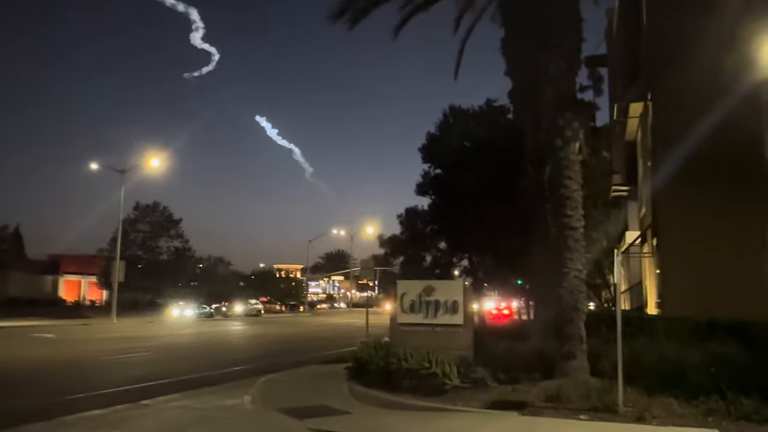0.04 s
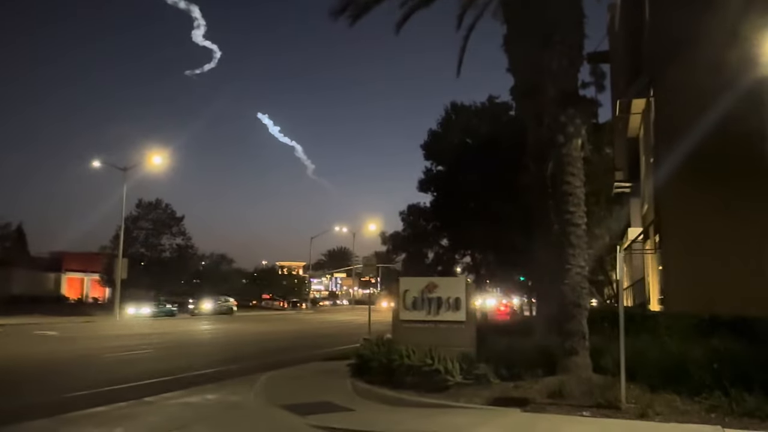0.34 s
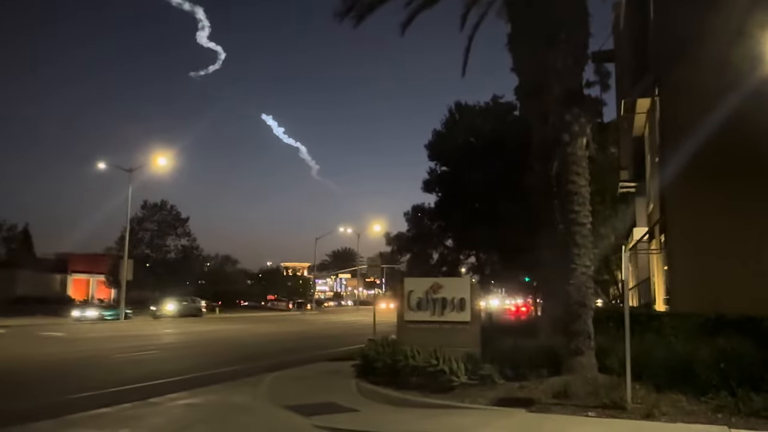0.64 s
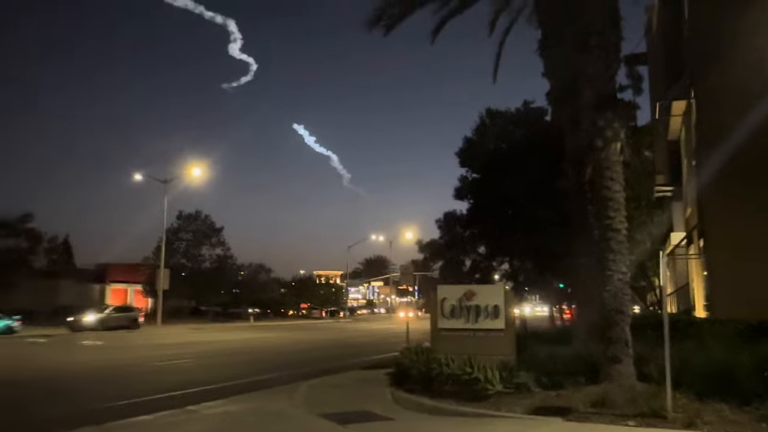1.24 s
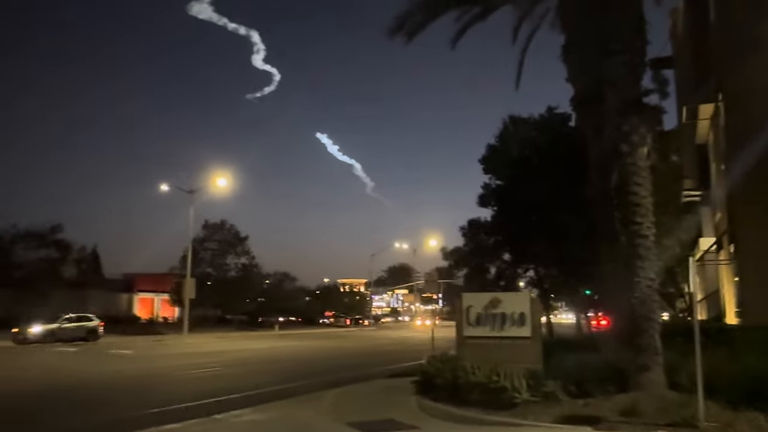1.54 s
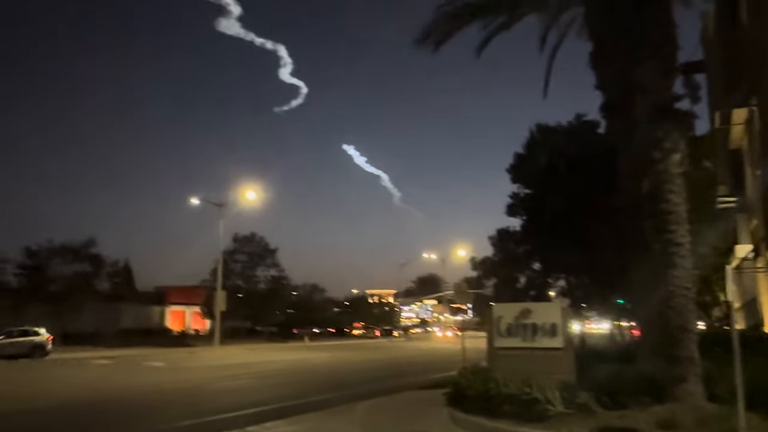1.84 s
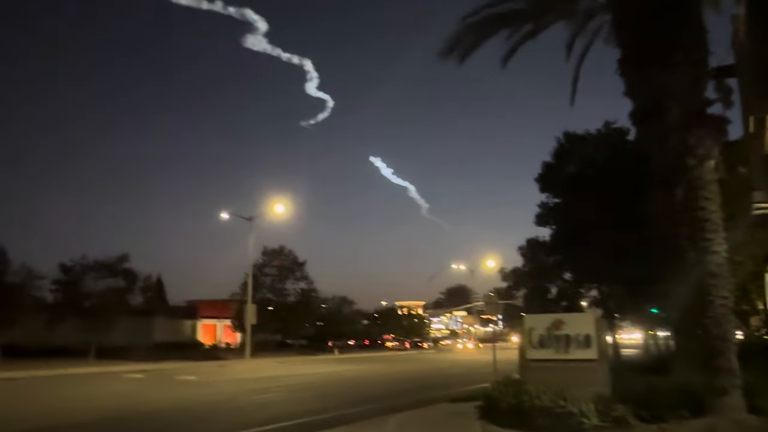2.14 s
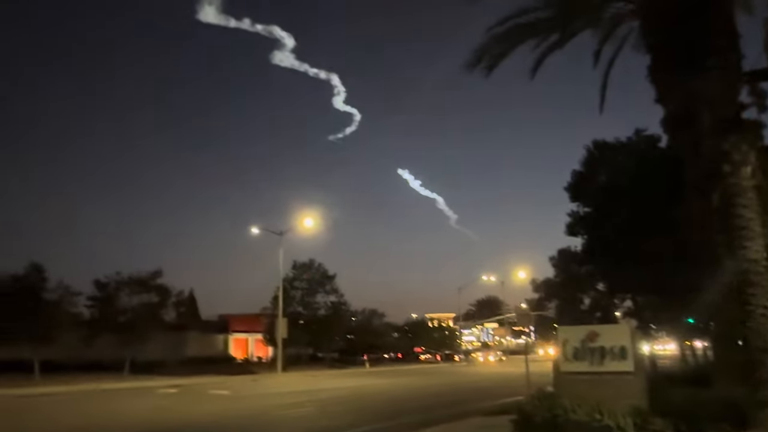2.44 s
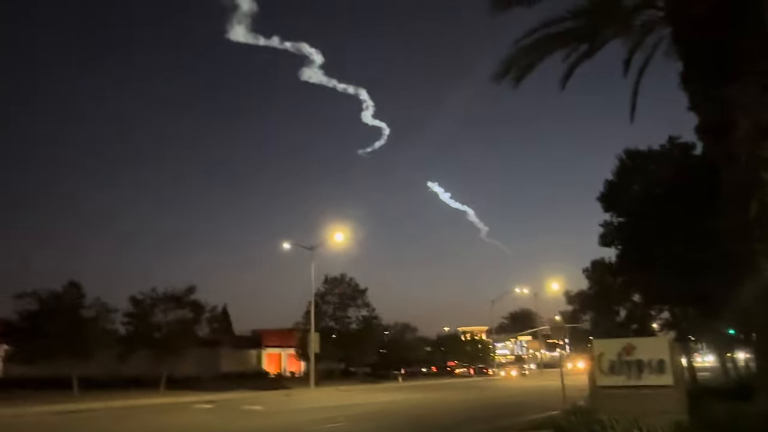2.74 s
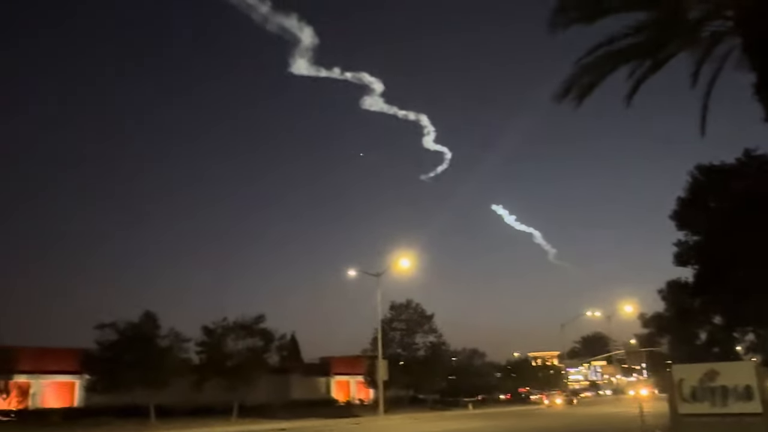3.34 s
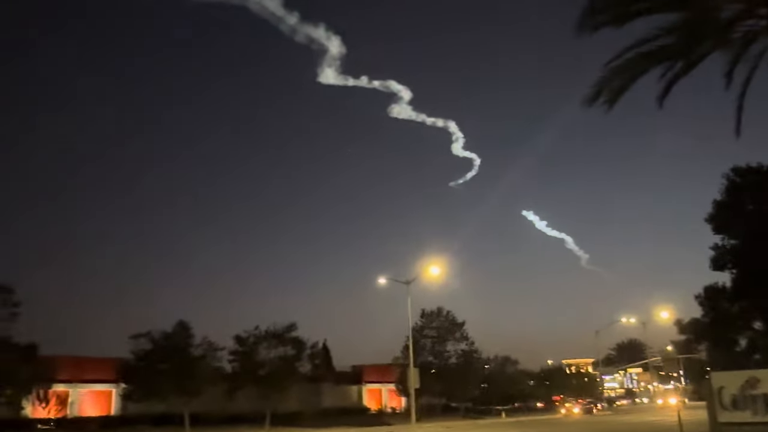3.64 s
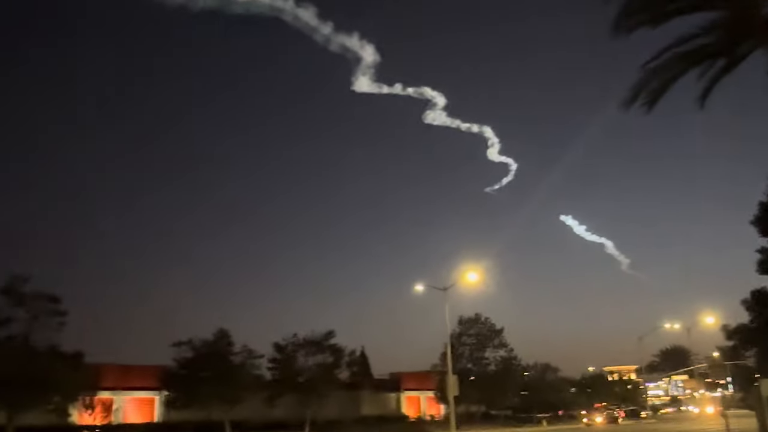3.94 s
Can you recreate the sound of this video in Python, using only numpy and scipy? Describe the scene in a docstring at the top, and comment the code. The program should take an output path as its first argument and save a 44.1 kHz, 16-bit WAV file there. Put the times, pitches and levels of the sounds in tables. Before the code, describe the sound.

Street traffic rumbles and hisses by, with one engine revving and a deeper one following.

```python
"""Evening traffic on a wide street, heard from the kerb by two closely spaced microphones.
From the start, over tyre noise, distant traffic and puffs of breeze, a car accelerates past to the left;
its exhaust note rises with the firing rate until the driver lifts off, near 1 s. Car bodies then thud,
and around 2 s tyres strike a joint in the road and ring. From 2.3 s a second, deeper exhaust swells,
then sinks in pitch as its revs drop, over the rumble of the other cars."""
import sys
import numpy as np
from scipy import signal
from scipy.fft import rfft, irfft, next_fast_len
from scipy.io import wavfile
from scipy.ndimage import uniform_filter1d, map_coordinates

SR = 44100
rng = np.random.default_rng(int(sys.argv[2]) if len(sys.argv) > 2 else 0)


def generate_wav(sig):
    """Save sig (samples, or channels by samples) to the path in sys.argv[1] as 16-bit PCM at SR."""
    pcm = np.round(np.clip(np.atleast_2d(sig).T, -1, 1) * 32767).astype(np.int16)
    wavfile.write(sys.argv[1], SR, pcm)


N = 176400

# firing rate of the accelerating car: t/s, f/Hz
CAR_FIRING = [(0, 123.9), (.29, 124.8), (.52, 128.8), (.87, 131.2), (1.06, 129.2), (1.17, 121.7),
              (1.5, 116.3)]
# its fundamental, and its overtones, which drop as the throttle closes: t/s, level/dB
CAR_LEVEL = [(0, -19), (.45, -16.5), (.73, -14), (.87, -16), (1.06, -18), (1.17, -23), (1.24, -23.5),
             (1.28, -27), (1.35, -28), (1.42, -37.5), (1.6, -36.5), (2, -66)]
CAR_LOAD = [(0, -17), (.18, -19), (.4, -21), (.7, -19), (.92, -18), (.96, -27), (1.2, -28.5), (1.6, -55.5),
            (2, -61.5)]
# brief fades of its fundamental: t/s, depth/dB, half-width/s
CAR_FADES = [(0.203, 13, 0.032), (0.373, 7, .018), (0.531, 5, 0.046), (0.916, 21, 0.038),
             (1.146, 15, 0.019)]
# its overtones: multiple of the firing rate, relative level/dB
CAR_ORDERS = [(.5, -30), (1.5, -28.5), (2, -18.5), (2.5, -21.5), (3, -12.5), (4, -23.5), (4.5, -34.5),
              (5, -19), (6, -38), (7, -29)]
# resonances of its silencer: f/Hz, half-width/Hz, boost/dB
CAR_SILENCER = [(260.4, 9.2, 10.1), (319.7, 7.4, 7)]
# spectrum of its turbulent gas: f/Hz, relative density/dB
GAS_SPECTRUM = [(50, -24.5), (90, 3), (140, -1.5), (200, -8), (330, 3), (400, -6), (470, -13), (650, -14.5),
                (1100, -23.5), (3000, -50)]

# envelopes of the four bands of tyre noise, low to high: t/s, level/dB
RUMBLE_LEVEL = [(0, -27), (.7, -29), (1.25, -27), (1.65, -26), (1.95, -28.5), (2.15, -30.5), (2.55, -29.5),
                (3.2, -32.5), (4, -29.5)]
ROAR_LEVEL = [(0, -34), (.7, -33.5), (1.2, -35), (1.8, -34.5), (2.1, -38), (2.5, -41.5), (3.2, -43.5),
              (4, -46)]
RASP_LEVEL = [(0, -53), (.6, -50), (1.15, -47.5), (1.42, -46), (1.7, -47.5), (2.2, -54), (2.6, -56),
              (2.92, -48), (3.3, -51.5), (3.6, -50), (4, -54)]
HISS_LEVEL = [(0, -51.5), (.65, -51), (1.35, -51.5), (1.9, -56.5), (2.4, -58.5), (2.9, -59.5),
              (3.25, -57.5), (4, -59)]
# their spectra: f/Hz, relative density/dB
RUMBLE_SPECTRUM = [(20, -34), (35, -17.5), (50, -5.5), (70, 3), (100, -1.5), (140, -6), (180, -9.5),
                   (225, -4.5), (290, -9.5), (340, -12), (430, -19), (650, -28.5), (1200, -66)]
ROAR_SPECTRUM = [(150, -10), (350, -4), (450, -2.5), (600, 2), (800, -3), (1030, 1), (1300, -6.5),
                 (1600, -6.5), (2000, -11.5), (2600, -20.5), (3300, -21.5), (4500, -34.5), (8000, -52.5)]
RASP_SPECTRUM = [(1200, -20), (1900, -2.5), (2350, 4.5), (2700, -.5), (3200, -12.5), (4000, -15),
                 (5000, -29), (8000, -36)]
HISS_SPECTRUM = [(2000, -13), (3200, -0.5), (4000, -2), (4800, -3), (6000, -2.5), (7200, -4.5), (8300, -10),
                 (9200, -20.5), (9700, -28.5)]
# likeness of left and right: f/Hz, coherence
ROAR_COHERENCE = [(300, 1), (700, 0.97), (1100, 1), (1700, 0.51), (2500, 0.94), (3500, 0.27)]
HISS_COHERENCE = [(3500, 0.47), (4500, 0.54), (6000, 0.43), (7000, 0.52), (7700, .3), (8500, .55)]
# earlier arrival of the upper roar at the left microphone: t/s, lead/ms
ROAR_LEAD = [(0, 0.12), (.6, 0.15), (1.4, 0.25), (2, 0.29), (3, 0.37), (4, 0.41)]

# spectra of distant traffic and of the breeze: f/Hz, relative density/dB
WASH_SPECTRUM = [(40, -5), (90, 0.5), (200, 5), (400, -4), (650, -2.5), (1000, -5), (1500, -6.5),
                 (2000, -23.5), (3000, -23.5), (6000, -44)]
BREEZE_SPECTRUM = [(20, -15.5), (55, -2.5), (100, 1.5), (200, -10.5), (400, -20.5), (1000, -61)]
# puffs on the microphones: t/s, level/dB, half-width/s
PUFFS = [(0.081, -32, 0.028), (1.45, -35, 0.024), (1.798, -34.5, 0.028), (3.33, -32.5, 0.19),
         (3.779, -30, 0.18)]

# thuds of car bodies: t/s, level/dB, f/Hz
THUDS = [(1.205, -11.5, 101.3), (1.229, -6, 109), (1.603, -18, 108), (1.958, -17, 80), (2.39, -17.5, 85)]
# tyre impacts on the joint: t/s, level/dB
SLAPS = [(1.908, -18.5), (1.964, -23.5), (1.992, -20.5), (2.029, -24)]
# modes of the contact smack and the tyre's ring: f/Hz, relative level/dB, T60/s
SMACK_MODES = [(660, -1, 0.011), (1000, -3.5, 0.0064), (634, -8.5, 0.17), (769, -16, 0.097)]
# spectrum of the street's after-ring: f/Hz, relative density/dB
RING_SPECTRUM = [(150, -13.5), (400, 2.5), (630, 11.5), (780, 7.5), (1050, -5.5), (1400, -16.5),
                 (4000, -40)]

# firing rate of the deep exhaust: t/s, f/Hz
DEEP_FIRING = [(2.5, 76.5), (3.03, 76.54), (3.3, 75.03), (3.44, 69.85), (3.52, 63.84), (3.62, 59.96),
               (4, 59.93)]
# its fundamental, its overtones and that car's rush: t/s, level/dB
DEEP_LEVEL = [(2.3, -71), (2.57, -28), (2.76, -28.5), (2.96, -18), (3.12, -16.5), (3.31, -19),
              (3.43, -15.5), (3.53, -18), (3.64, -17), (3.8, -20), (3.93, -23.5), (4, -14.5)]
DEEP_LOAD = [(2.3, -43.5), (2.57, -21), (2.97, -18.5), (3.12, -21), (3.55, -20), (4, -27)]
DEEP_RUSH_LEVEL = [(2.3, -66.5), (2.8, -49.5), (3.25, -40), (3.6, -48.5), (4, -44)]
# brief fades of its fundamental: t/s, depth/dB, half-width/s
DEEP_FADES = [(3.493, 16, 0.019), (3.583, 11, 0.017), (3.72, 4.5, 0.048), (3.868, 4.5, 0.02)]
# its overtones: multiple of the firing rate, relative level/dB
DEEP_ORDERS = [(2, -15.5), (3, -26), (4, -24.5), (5, -35), (6, -27.5)]
# resonance of its silencer: f/Hz, half-width/Hz, boost/dB
DEEP_SILENCER = [(306, 17, 6)]
# spectrum of the rush: f/Hz, relative density/dB
DEEP_RUSH_SPECTRUM = [(200, -11), (450, 2), (700, 7.5), (950, -2), (1400, -0.5), (1900, -12.5), (3000, -34)]

# imbalance of the microphones: f/Hz, left over right/dB
MIC_TILT = [(100, -0.26), (300, 0.5), (800, 2), (1350, -3), (1950, -4.5), (2900, 2), (4200, 3.5),
            (6100, 10.5), (9000, -0.5)]


def amp(db):
    """Amplitude ratio of a level in decibels."""
    return 10 ** (np.asarray(db) / 20)


def unit(x):
    """Normalisation to an rms of 1."""
    return x / np.sqrt(np.mean(x ** 2) + 1e-20)


def along(points, hz):
    """Interpolation of (f/Hz, value) rows on a logarithmic frequency axis."""
    f, values = np.transpose(points)
    return np.interp(np.log(hz + 1), np.log(f + 1), values)


def curve(rows):
    """Linear interpolation of (t/s, value) rows at every sample."""
    return np.interp(np.arange(N) / SR, *np.transpose(rows))


def wobble(rate):
    """Smooth random modulation, a spline through `rate` knots a second."""
    return map_coordinates(rng.standard_normal(1024), [np.arange(N) * rate / SR], mode="wrap")


def swell(s, width):
    """A Gaussian pulse of height 1 around time s."""
    return np.exp(-((np.arange(N) / SR - s) / width) ** 2)


def since(s):
    """Seconds since time s, zero before it."""
    return np.maximum(np.arange(N) / SR - s, 0)


def filtered(x, response):
    """Linear filtering: the spectrum is multiplied by a frequency response."""
    size = next_fast_len(N + SR // 2)
    hz = np.fft.rfftfreq(size, 1 / SR)
    return irfft(rfft(x, size) * response(hz), size)[..., :N]


def rush(spectrum, coherence, patchy_db):
    """Partly coherent stereo noise of rms 1, its gain varying in patches of time and frequency."""
    def mid_side_response(hz):
        angle = np.arccos(np.clip(along(coherence, hz), -1, 1)) / 2
        return amp(along(spectrum, hz)) * [np.cos(angle), np.sin(angle)]

    cells = signal.stft(rng.standard_normal((2, N)), nperseg=512)[2]
    patches = uniform_filter1d(rng.standard_normal(cells.shape[1:]), size=6, axis=0)
    patches = uniform_filter1d(patches, size=14, axis=1)
    pair = signal.istft(cells * amp(patchy_db * unit(patches)), nperseg=512)[1][:, :N]
    mid, side = filtered(pair, mid_side_response)
    return unit(np.array([mid + side, mid - side]))


def from_left(pair, lead_ms):
    """Path difference: sound from the left reaches the left microphone first."""
    half_lead = lead_ms * SR / 2000
    return np.array([map_coordinates(x, [np.arange(N) + sign * half_lead], mode="mirror")
                     for x, sign in zip(pair, (1, -1))])


def silencer_db(resonances, hz):
    """Resonance: each peak boosts the overtones that slide through it."""
    return sum(db / (1 + ((hz - centre) / width) ** 2) for centre, width, db in resonances)


def exhaust(firing, level, fades, load, orders, silencer,
            jitter, flutter_db, overtone_flutter_db, smear_rad):
    """Periodic firing radiates a fundamental and wavering overtones locked to its rate."""
    firing_hz = curve(firing) * (1 + jitter * wobble(30))
    phase = 2 * np.pi * np.cumsum(firing_hz) / SR
    fade_db = sum(db * swell(s, width) for s, db, width in fades)
    note = amp(curve(level) - fade_db + flutter_db * wobble(21.53)) * np.cos(phase)
    for order, db in orders:
        overtone_db = curve(load) + db + silencer_db(silencer, order * firing_hz)
        gain = amp(overtone_db + overtone_flutter_db * wobble(9))
        note += gain * np.cos(order * phase + rng.uniform(-0.99, 1) + smear_rad * wobble(14))
    return np.sqrt(2) * np.array([note, note])


def accelerating_car():
    """Pitch rises with firing rate; overtones and gas turbulence fall as the throttle closes."""
    note = exhaust(CAR_FIRING, CAR_LEVEL, CAR_FADES, CAR_LOAD, CAR_ORDERS, CAR_SILENCER,
                   jitter=0.003, flutter_db=1.1, overtone_flutter_db=2, smear_rad=0.35)
    gas = amp(curve(CAR_LOAD) - 14.5) * rush(GAS_SPECTRUM, [(300, 1)], patchy_db=2)
    return from_left(note + gas, lead_ms=0.17)


def tyres():
    """Rolling contact radiates broadband noise; a growing lead carries roar and rasp to the left."""
    rumble = amp(curve(RUMBLE_LEVEL) + 0.98 * wobble(14))
    rumble = rumble * rush(RUMBLE_SPECTRUM, [(50, 0.7), (300, 1)], patchy_db=1.8)
    roar = amp(curve(ROAR_LEVEL) + 0.3 * wobble(18))
    roar = roar * rush(ROAR_SPECTRUM, ROAR_COHERENCE, patchy_db=0.2)
    rasp = amp(curve(RASP_LEVEL) + 0.35 * wobble(12))
    rasp = rasp * rush(RASP_SPECTRUM, [(2400, 0.49), (3500, 0.46)], patchy_db=0.76)
    hiss = amp(curve(HISS_LEVEL) + 0.27 * wobble(4.6))
    hiss = hiss * rush(HISS_SPECTRUM, HISS_COHERENCE, patchy_db=1.05)
    crossover_hz, lead_ms = 1070, curve(ROAR_LEAD)
    low_roar = filtered(roar, lambda hz: 1 / (1 + (hz / crossover_hz) ** 10))
    moving = from_left(roar - low_roar, lead_ms) + from_left(low_roar, 0.46 * lead_ms)
    moving += from_left(rasp, lead_ms + 0.064)  # a little further left
    return moving + from_left(rumble, lead_ms=0.19) + from_left(hiss, lead_ms=0.021)


def distant_traffic():
    """A diffuse field: sound from all sides has little coherence between the microphones."""
    wash = rush(WASH_SPECTRUM, [(100, 0.22), (1000, 0.05)], patchy_db=1.7)
    return amp(-41 + 0.5 * wobble(5.9)) * wash


def breeze():
    """Wind noise: puffs make slow pressure fluctuations, nearly independent at each microphone."""
    puffs = sum(amp(db) * swell(s, width) for s, db, width in PUFFS)
    return puffs * amp(4.3 * wobble(20)) * rush(BREEZE_SPECTRUM, [(50, 0.1)], patchy_db=0.5)


def decay(s, t60_s, attack_s):
    """Damping: after a quick rise at time s, the level falls 60 dB in t60_s."""
    t = since(s)
    return amp(-60 * t / t60_s) * (1 - np.exp(-t / attack_s))


def knock(s, hz, t60_s, attack_s):
    """Free vibration of a damped mode struck at time s."""
    return decay(s, t60_s, attack_s) * np.sin(2 * np.pi * hz * since(s))


def body_thuds():
    """The bodies of passing cars thud, each blow exciting one low, heavily damped mode."""
    thuds = sum(amp(db) * knock(s, hz, t60_s=0.08, attack_s=0.002) for s, db, hz in THUDS)
    return from_left([thuds, thuds], lead_ms=0.16)


def joint_slaps():
    """Impact on the joint excites a tyre's modes, and the street reverberates with a rough ring."""
    smacks = sum(amp(db + mode_db) * knock(s, hz, t60_s, attack_s=0.00017)
                 for s, db in SLAPS for hz, mode_db, t60_s in SMACK_MODES)
    ring_envelope = sum(amp(db - 16) * decay(s, t60_s=0.3, attack_s=0.0045) for s, db in SLAPS)
    ring = ring_envelope * rush(RING_SPECTRUM, [(100, 0.86), (1000, 0.43)], patchy_db=4)
    return from_left(smacks + ring, lead_ms=0.16)


def deep_car():
    """A falling firing rate lowers the boom of an exhaust far to the left, over its car's rush."""
    note = exhaust(DEEP_FIRING, DEEP_LEVEL, DEEP_FADES, DEEP_LOAD, DEEP_ORDERS, DEEP_SILENCER,
                   jitter=0.004, flutter_db=0.3, overtone_flutter_db=1.8, smear_rad=0.25)
    rolling = amp(curve(DEEP_RUSH_LEVEL)) * rush(DEEP_RUSH_SPECTRUM, [(1000, 0.98)], patchy_db=0)
    return from_left(note + rolling, lead_ms=0.44)


def scene():
    """Superposition: the pressures of all sources add at each microphone."""
    opening = accelerating_car() + tyres() + distant_traffic() + breeze()
    return opening + body_thuds() + joint_slaps() + deep_car()


def record(dry):
    """Frequency response: the two microphones differ in colour and share one band limit."""
    top_hz = 9650
    return filtered(dry, lambda hz: amp(np.outer([1, -1], along(MIC_TILT, hz)) / 2) * (hz < top_hz))


dry = scene()
out = record(dry)
generate_wav(out)
```